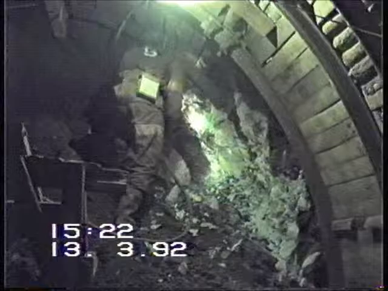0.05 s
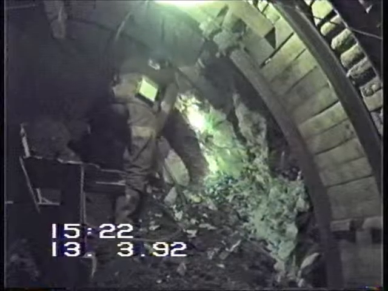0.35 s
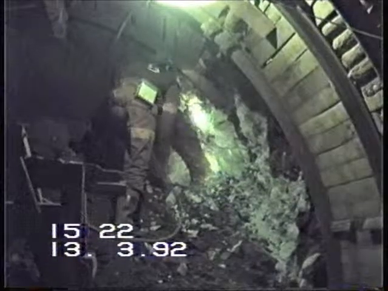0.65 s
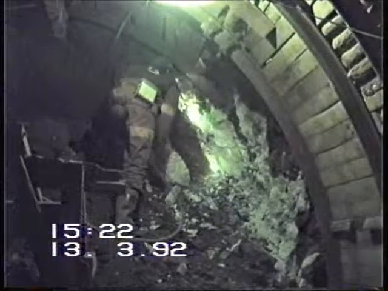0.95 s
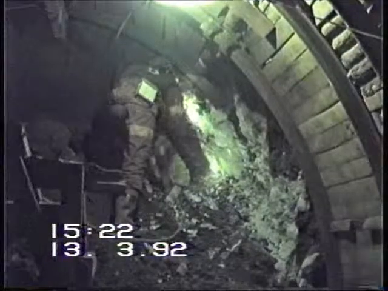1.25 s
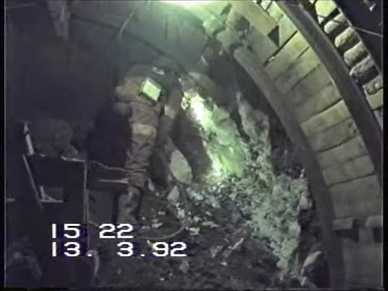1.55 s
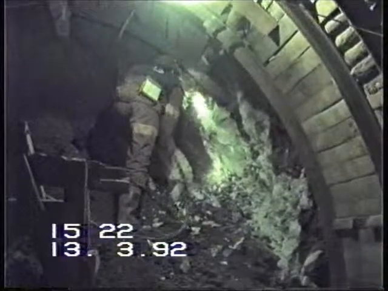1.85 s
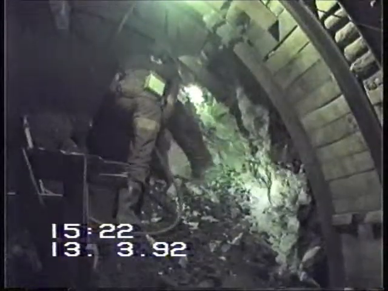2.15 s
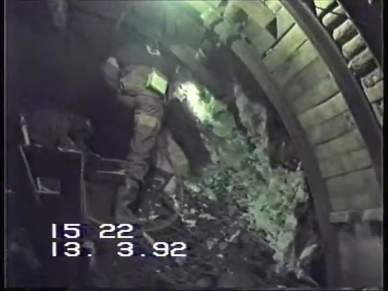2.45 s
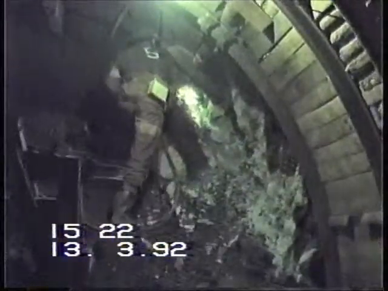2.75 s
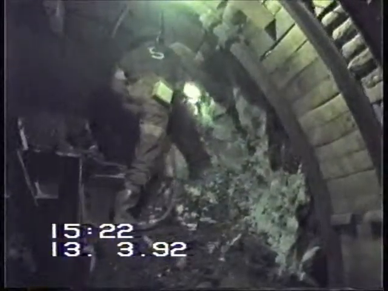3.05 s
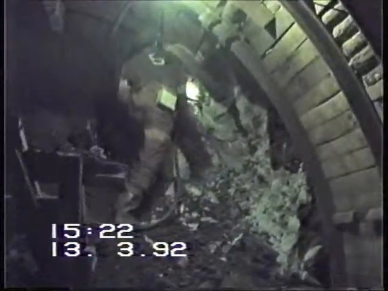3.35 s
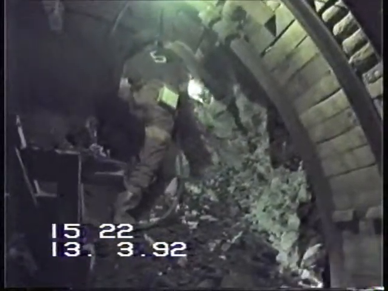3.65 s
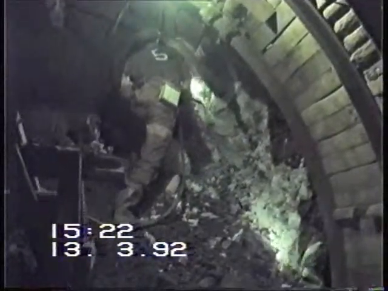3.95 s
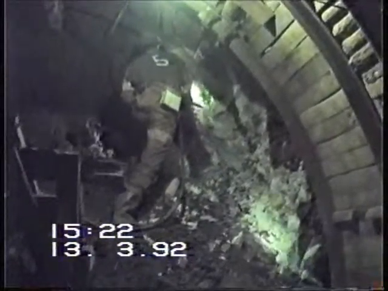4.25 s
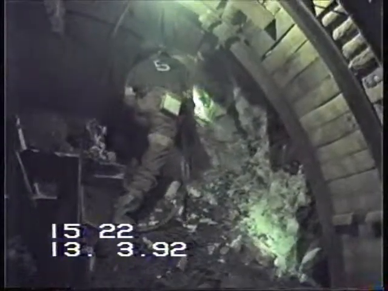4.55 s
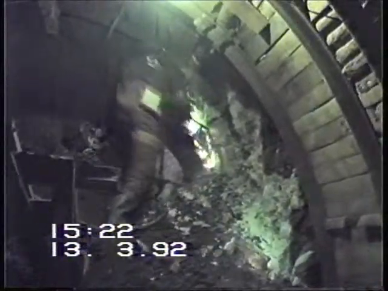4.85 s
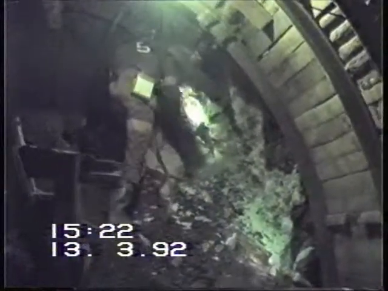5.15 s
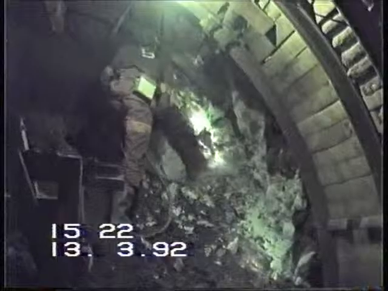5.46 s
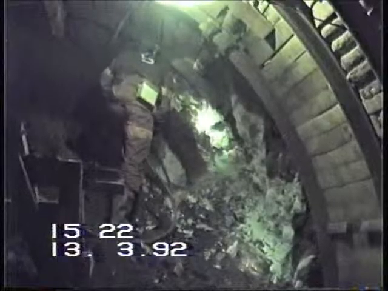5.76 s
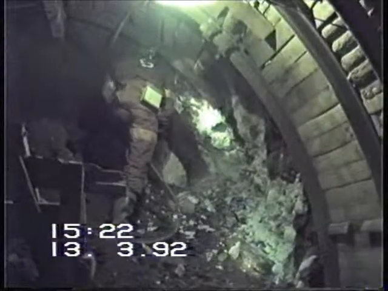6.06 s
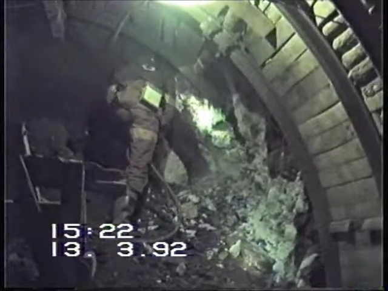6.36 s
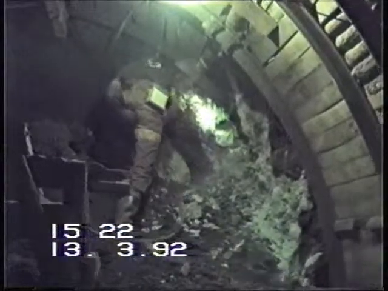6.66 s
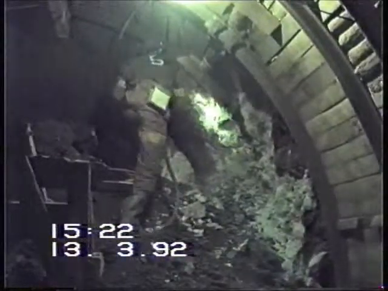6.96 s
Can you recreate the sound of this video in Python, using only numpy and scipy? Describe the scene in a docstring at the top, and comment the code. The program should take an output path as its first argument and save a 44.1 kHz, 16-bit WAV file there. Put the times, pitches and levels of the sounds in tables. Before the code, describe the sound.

A steel pick is set against rock with a few light clanks and clinks over soft background hiss. Then the pneumatic hammer pounds in a fast, loud rattle, hardest at the start, with thuds of air and a bright metallic ring. The burst ends quickly, followed by ringing clanks and faint stone knocks. The sound is mono, with the short echo of a narrow tunnel.

```python
"""A pneumatic pick at the rock face of a tunnel, heard on one microphone inside the close lining.
The miner sets the steel with a few clanks, fires one burst of about 24 strokes a second, and lets
the steel ring out. Each stroke is an exhaust thump, then a crack on the rock and a ring of the steel.
Loose stones knock, two faint squeaks come from far off, and a low-level hiss lies under it all."""
import sys
import numpy as np
from scipy import signal
from scipy.fft import rfft, irfft
from scipy.io import wavfile
from scipy.ndimage import uniform_filter1d

SR = 44100
rng = np.random.default_rng(int(sys.argv[2]) if len(sys.argv) > 2 else 0)


def bounce(signal):
    """Save signal as a 16-bit WAV file at the path given by the first command-line argument."""
    frames = np.transpose(np.atleast_2d(signal))
    limited = np.clip(frames, -1, 1)
    pcm = np.round(limited * 32767).astype(np.int16)
    wavfile.write(sys.argv[1], SR, pcm)


N = 308700
TIME = np.arange(N) / SR

# spectra of the hiss, the tip touching rock and a full blow: frequency_hz, relative_density_db
HISS_SPECTRUM = [(12, -22), (20, -5), (54, -1), (81, -7), (139, -7), (173, -11), (208, -8.5), (535, -14),
                 (612, -15), (892, -16), (1200, -17), (3720, -17.5), (7910, -11), (11500, -17.5),
                 (12500, -31.5), (16200, -59.5), (22000, -120)]
CLANK_SPECTRUM = [(40, -26), (150, -12), (450, -12.5), (700, -5.5), (1400, -2), (2500, -3.5), (3700, 4.5),
                  (5000, 0.5), (7000, -2), (9000, -5.5), (12000, -31)]
CRACK_SPECTRUM = [(400, 8), (900, -1.5), (1500, -4), (2500, -4), (4000, -5), (5200, -5.5), (6400, 1),
                  (7500, -5), (9000, -7.5), (10500, -17), (11500, -25), (12500, -28)]
# slow swell of the hiss: time_s, gain_db
HISS_DRIFT = [(0, -1), (2.0, 0), (3.2, 1), (5.3, -1), (5.9, -1), (6.5, 0), (7, -0.5)]
# faint squeaks far from the microphone: start_s, length_s, start_hz, end_hz, level_db
FAR_SQUEAKS = [(0.005, 0.085, 757, 690, -58), (0.099, 0.097, 560, 496, -63)]
# short knocks and clinks of stones and of the steel touching rock:
# start_s, level_db, centre_hz, width_octaves
KNOCKS_AND_CLINKS = [(0.200, -53, 700, 1.4), (0.520, -55, 3470, 2), (1.078, -57, 1990, 1.8),
                     (1.150, -52.5, 2340, 3.2), (1.222, -59, 674, .65), (2.122, -45, 1350, .81),
                     (2.322, -40, 3040, .086), (2.732, -51, 165, 0.76), (2.920, -51, 2600, 2.5),
                     (3.016, -50.5, 3650, 1.8), (3.255, -33.5, 3180, 1.8), (3.256, -35, 1477, 0.29),
                     (3.258, -42.5, 340, 1.7), (3.332, -33.5, 454, 0.86), (4.671, -34, 102, 1.2),
                     (5.022, -35, 185, .5), (5.458, -35, 4520, .3), (5.458, -43, 2184, .1),
                     (5.458, -43, 3480, 0.07), (5.461, -50.5, 288, 1.5), (5.590, -54.5, 3400, 1.1),
                     (5.736, -54.5, 1460, 2.7), (6.145, -52, 3700, 2), (6.660, -47, 2470, 3.4),
                     (6.728, -54, 2000, 1.5)]
# the loose steel knocks on rock and excites a band of its modes:
# start_s, relative_crack_db, relative_ring_db, ring_t60_s, centre_hz, width_octaves
STEEL_CLANKS = [(2.121, -41, -37.5, 0.21, 5000, 1.05), (2.322, -43.5, -53.5, 0.15, 5500, .8),
                (5.126, -48, -38.5, 0.33, 3000, 3.6), (5.408, -63, -54, .1, 5250, 0.65),
                (5.459, -39, -34.5, 0.24, 8500, 1.4), (5.637, -65, -65.5, 0.089, 6160, .5),
                (6.675, -56.5, -47, 0.1, 5990, 0.27)]
# modes of the pick steel, each a beating pair: pitch_hz, relative_db, split_hz
BENDING_MODES = [(2072, -14.5, 17), (3795, -7.5, 45), (3770, -14, 99), (5953, -2.5, 24), (6030, -7.5, 65),
                 (8520, -4, 27), (11310, -18.5, 30)]
LENGTHWISE_MODES = [(6646, 1, 28), (6200, -16, 330), (6220, -10.5, 340)]
# the piston changes pace with the miner's push: start_s, nominal_strokes_per_s
PISTON_PACE = [(3.3737, 25), (3.4943, 23.5), (3.7495, 22), (3.8869, 23.5), (4.1425, 25.5), (4.6138, 19.5),
               (4.719, 25.5), (4.955, 23)]
# the exhaust thump returns from floor and lining: delay_s, gain_db
LINING_ECHOES = [(.0034, -4), (.0061, -16), (.0118, -17), (0.0172, -11), (.0215, -8), (.0272, -13)]
# hollow resonances of the heading, rung by the exhaust: pitch_hz, relative_db, t60_s
HEADING_MODES = [(275.3, -10.5, 0.18), (294, -12.5, 0.16), (355, -14, .16), (376, -12, 0.038),
                 (433.7, -11, 0.18), (513, -11.5, 0.047), (528, -18.5, 0.092), (587.2, -13, 0.28),
                 (625.3, -14.5, 0.29), (736, -23, 0.23), (868, -20, .09), (883, -16.5, 0.074),
                 (947, -13, .12), (1171, -16.5, .11), (1262, -19, 0.16)]
# how strongly the steel rings as its seat in the rock changes: time_s, lengthwise_db, bending_db
SEAT_RING = [(3.37, -40, -35), (3.42, -30, -40), (3.58, -28, -36), (3.77, -40, -32), (3.85, -29.5, -34),
             (4.10, -28.5, -36), (4.22, -35, -37.5), (4.50, -35, -37.5), (4.59, -30, -34.5),
             (4.85, -35.5, -40), (4.94, -31.5, -34), (5.02, -33.5, -30.5)]

FIRST_STROKE_S, FIRST_STROKE_DB = 3.3484, -3.5  # a weaker stroke as the valve opens
LAST_STROKE_S, REBOUND_S = 4.9985, 5.021  # after the last stroke the steel springs free
SURGE_DECAY_S = 0.22  # air stored in the hose drives the first strokes harder
CRACK_DB, CRACK_SURGE_DB, REBOUND_CRACK_DB = -26, 7, -30.5
SPRAY_ABOVE_HZ, SPRAY_DB, SPRAY_SURGE_DB = 6498, -24.5, 1.5  # fine chips gain less from the surge
GRIP_BELOW_HZ, GRIP_DB = 5000, -4  # pressing into the rock damps the low bending modes
RUBBLE_PER_S, RUBBLE_DB, RUBBLE_LOW_HZ, RUBBLE_HIGH_HZ, RUBBLE_OCTAVES = 2, -64, 350, 4000, .6
HISS_DB, RING_SCATTER_DB, CUTOFF_HZ = -56.5, 3, 12500


def from_db(db):
    """Decibels to gain."""
    return 10 ** (np.asarray(db) / 20)


def rms_one(x):
    """Scale to an rms of 1."""
    return x / np.sqrt(np.mean(x ** 2) + 1e-20)


def band(x, low_hz, high_hz):
    """Causal band-pass."""
    edges_hz = [max(low_hz, 15), min(high_hz, .45 * SR)]
    return signal.sosfilt(signal.butter(2, edges_hz, "band", fs=SR, output="sos"), x + 1e-18)


def coloured(x, spectrum):
    """Give a steady signal a spectrum; rms 1."""
    hz, db = np.transpose(spectrum)
    bins_hz = np.maximum(np.fft.rfftfreq(N, 1 / SR), 1)
    gain = from_db(np.interp(np.log(bins_hz), np.log(hz), db))
    return rms_one(irfft(rfft(x) * gain, N))


def grit(spread_db):
    """Noise of many tiny fractures and reflections of uneven size."""
    return rng.standard_normal(N) * from_db(spread_db * rng.standard_normal(N))


def clicks(times, db):
    """One sample for each blow."""
    out = np.zeros(N)
    np.add.at(out, np.round(times * SR).astype(int), from_db(db))
    return out


def resonator(x, hz, t60):
    """A unit click sets a sine of height 1 ringing."""
    radius, angle = 10 ** (-3 / (t60 * SR)), 2 * np.pi * hz / SR
    return signal.lfilter([0, np.sin(angle)], [1, -2 * radius * np.cos(angle), radius ** 2], x + 1e-18)


def blow_envelope(times, db, rise_s, t60):
    """Overlapping blows build up and die away; their powers add."""
    power = np.zeros(N)
    for start_s, gain, decay_s in np.broadcast(times, from_db(db), t60):
        start = round(start_s * SR)
        age = TIME[:min(N - start, SR // 2)]
        blow = gain * (1 - np.exp(-age / rise_s)) * 10 ** (-3 * age / decay_s)
        power[start:start + len(age)] += blow ** 2
    return np.sqrt(power)


def hiss():
    """The tunnel's background: bright hiss over a faint rumble, swelling slightly."""
    swell_db = np.interp(TIME, *np.transpose(HISS_DRIFT))
    return from_db(HISS_DB + swell_db) * coloured(rng.standard_normal(N), HISS_SPECTRUM)


def squeaks():
    """Thin, distant tones that swell, sag in pitch and fade."""
    out = np.zeros(N)
    for start_s, length_s, start_hz, end_hz, db in FAR_SQUEAKS:
        progress = np.clip((TIME - start_s) / length_s, 0, 1)
        phase = 2 * np.pi * np.cumsum(start_hz + (end_hz - start_hz) * progress) / SR
        out += from_db(db) * np.sin(np.pi * progress) * np.sin(phase)
    return out


def tunnel(x, echo_db, t60, first_echo_s):
    """The close lining returns a short, dense wash of echoes to the microphone."""
    age = TIME[:SR // 2]
    echoes = rng.standard_normal(len(age)) * 10 ** (-3 * age / t60) * (age > first_echo_s)
    return x + from_db(echo_db) * signal.fftconvolve(x, echoes / np.linalg.norm(echoes))[:N]


def knocks():
    """Stones, or the steel touching rock, sound briefly in one band each; rubble settles at random."""
    out = np.zeros(N)
    grains = band(grit(spread_db=6), low_hz=40, high_hz=9000)
    rubble = []
    for when, pitch in rng.random((round(RUBBLE_PER_S * N / SR), 2)):
        hz = RUBBLE_LOW_HZ * (RUBBLE_HIGH_HZ / RUBBLE_LOW_HZ) ** pitch
        rubble.append((when * TIME[-1], RUBBLE_DB, hz, RUBBLE_OCTAVES))
    for start_s, db, hz, octaves in KNOCKS_AND_CLINKS + rubble:
        edge_ratio = 2 ** (octaves / 2)
        contact = rms_one(band(grains, hz / edge_ratio, hz * edge_ratio))
        out += blow_envelope([start_s], [db], rise_s=.001, t60=.14) * contact
    return out


def steel_tones(modes, width_hz, partner_db):
    """A (pitch, tone) for each mode, beating against its partner; play in the socket makes both waver."""
    tones = []
    for hz, mode_db, split_hz in modes:
        waver = np.cumsum(rng.standard_normal((2, N)), axis=1) * np.sqrt(2 * np.pi * width_hz / SR)
        waver = uniform_filter1d(waver, size=40, axis=1)
        main = np.sin(2 * np.pi * hz * TIME + waver[0])
        partner = np.sin(2 * np.pi * (hz + split_hz) * TIME + waver[1])
        tones.append((hz, from_db(mode_db) * rms_one(main + from_db(partner_db) * partner)))
    return tones


def clanks():
    """The tip touches rock: a crack, and the loose steel rings in the bending modes the contact favours."""
    times, crack_db, ring_db, t60, centre_hz, octaves = np.transpose(STEEL_CLANKS)
    grains = coloured(grit(spread_db=3.5), CLANK_SPECTRUM)
    out = blow_envelope(times, crack_db + 6, rise_s=.00067, t60=.17) * grains
    for hz, tone in steel_tones(BENDING_MODES, width_hz=5, partner_db=-.5):
        mode_db = ring_db + 3.5 - 3 * (np.log2(hz / centre_hz) / octaves) ** 2
        out += tone * blow_envelope(times, mode_db, rise_s=.001, t60=t60)
    return out


def stroke_times():
    """The first short stroke, then evenly spaced strokes within each stretch of steady pace."""
    starts, rates = np.transpose(PISTON_PACE)
    ends = np.append(starts[1:], LAST_STROKE_S)
    runs = [np.linspace(start, end, round((end - start) * rate), endpoint=False)
            for start, end, rate in zip(starts, ends, rates)]
    return np.concatenate([[FIRST_STROKE_S], *runs, [LAST_STROKE_S]])


def stroke_levels(times, working_db, surge_db, scatter_db):
    """Strokes are hard at first, sag with the air pressure and are never twice the same."""
    first_full_s = PISTON_PACE[0][0]
    surge = np.exp(-np.maximum(times - first_full_s, 0) / SURGE_DECAY_S)
    opening_db = FIRST_STROKE_DB * (times < first_full_s)
    return working_db + surge_db * surge + opening_db + scatter_db * rng.standard_normal(len(times))


def exhaust(times, thump_db):
    """The piston vents: a thump with its echoes, the hollow of the heading, and a slower push of bass."""
    vents = times + .00127
    puffs = clicks(vents, thump_db)
    echoes = sum(clicks(vents + delay_s, thump_db + echo_db) for delay_s, echo_db in LINING_ECHOES)
    low_hz, high_hz = 317.6, 697
    thump = band(puffs + echoes, low_hz, high_hz) * SR / (2 * (high_hz - low_hz))
    hollow = sum((-1) ** k * from_db(mode_db) * resonator(puffs, hz, t60)
                 for k, (hz, mode_db, t60) in enumerate(HEADING_MODES))
    push = resonator(clicks(vents + .0031, thump_db), hz=82.7, t60=.017)
    bass = band(push, low_hz=48.46, high_hz=220)
    air = from_db(1.5) * thump + from_db(-1.5) * hollow + from_db(-6) * bass
    return signal.sosfilt(signal.butter(3, 45, "high", fs=SR, output="sos"), air)


def hammer(times, thump_db):
    """Just after venting, the piston drives the steel home: the rock cracks, sprays chips and thuds."""
    impacts = times + .003
    crack_times = np.append(impacts, REBOUND_S)
    grains = coloured(band(grit(spread_db=2.5), low_hz=600, high_hz=16000), CRACK_SPECTRUM)
    crack = np.zeros(N)
    for side, db, surge_db in (("low", CRACK_DB, CRACK_SURGE_DB), ("high", SPRAY_DB, SPRAY_SURGE_DB)):
        force_db = np.append(stroke_levels(times, db, surge_db, scatter_db=.5), REBOUND_CRACK_DB)
        fracture = signal.sosfilt(signal.butter(3, SPRAY_ABOVE_HZ, side, fs=SR, output="sos"), grains)
        crack += blow_envelope(crack_times, force_db, rise_s=.00063, t60=.17) * fracture
    # the broken rock gives way with a dull, uneven thud
    rumble = rms_one(band(rng.standard_normal(N), low_hz=45.2, high_hz=266))
    thud = blow_envelope(impacts, thump_db - 10.5, rise_s=.0011, t60=.12) * rumble
    return crack + thud + steel_ring(impacts)


def restruck_envelope(times, db, rise_s, t60):
    """Every blow stops the old ring and starts its own; only the last one rings out."""
    latest = np.searchsorted(times, TIME) - 1
    age = np.abs(TIME - times[latest])
    level = from_db(db[latest] - 60 * age / t60) * (latest >= 0)
    smoothing = np.exp(-1 / (rise_s * SR))
    return signal.lfilter([1 - smoothing], [1, -smoothing], level + 1e-18)


def struck_modes(modes, times, db, width_hz, partner_db):
    """Each blow shares its energy among the modes a little differently; the rebound rings evenly."""
    out = np.zeros(N)
    grip = from_db(GRIP_DB * (TIME < REBOUND_S))
    for hz, tone in steel_tones(modes, width_hz, partner_db):
        scatter = np.clip(rng.standard_normal(len(times)), -2, 1) * (times < REBOUND_S)
        level = restruck_envelope(times, db + RING_SCATTER_DB * scatter, rise_s=.0044, t60=.42)
        out += tone * level * (grip if hz < GRIP_BELOW_HZ else 1)
    return out


def steel_ring(impacts):
    """Every full blow, and the rebound at the end, sets the steel ringing lengthwise and sideways."""
    times = np.append(impacts[1:], REBOUND_S)
    seat_s, *seat_levels = np.transpose(SEAT_RING)
    lengthwise_db, bending_db = (np.interp(times, seat_s, db) for db in seat_levels)
    lengthwise = struck_modes(LENGTHWISE_MODES, times, lengthwise_db, width_hz=36, partner_db=-5)
    bending = struck_modes(BENDING_MODES, times, bending_db, width_hz=32.2, partner_db=-1)
    return lengthwise + bending


def scene():
    """One microphone in the tunnel hears it all, so both channels are alike."""
    times = stroke_times()
    thump_db = stroke_levels(times, working_db=-26, surge_db=13.5, scatter_db=.6)
    direct = hammer(times, thump_db) + clanks() + knocks() + squeaks()
    echoing = tunnel(direct, echo_db=-12, t60=.36, first_echo_s=.005)
    return np.tile(echoing + exhaust(times, thump_db) + hiss(), (2, 1))


def record(dry):
    """The top of the microphone's signal is cut steeply."""
    return signal.sosfilt(signal.ellip(10, .2, 80, CUTOFF_HZ, fs=SR, output="sos"), dry)


dry = scene()
out = record(dry)
bounce(out)
```